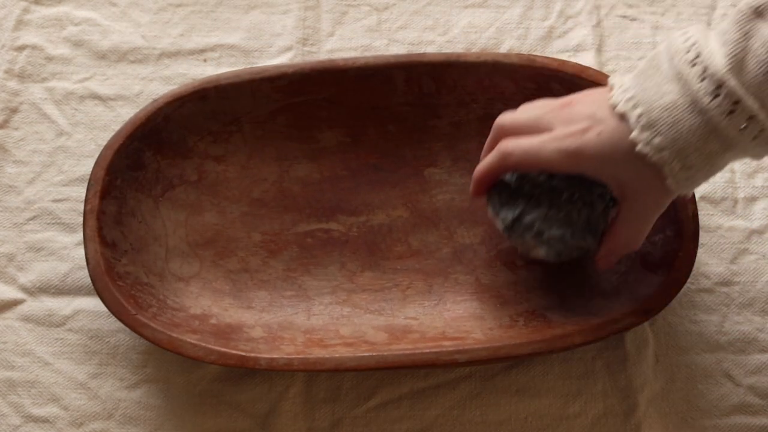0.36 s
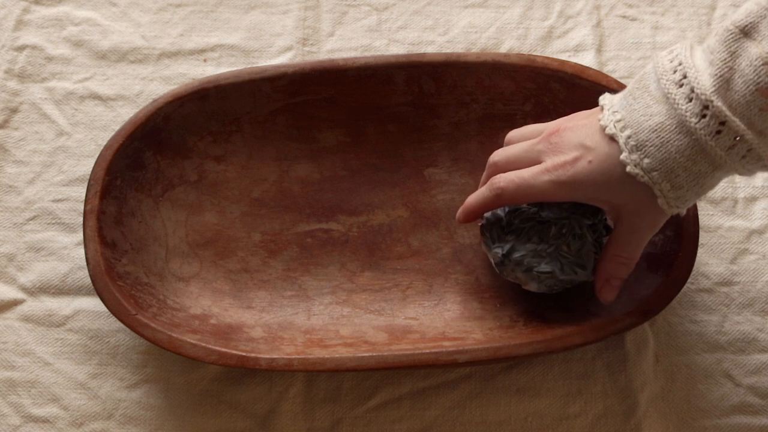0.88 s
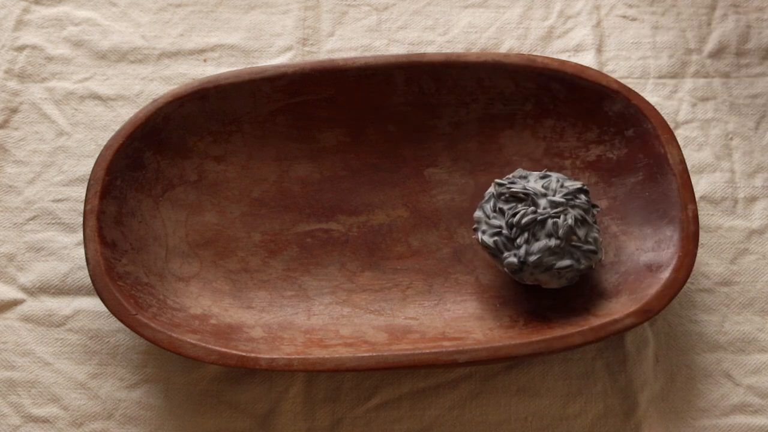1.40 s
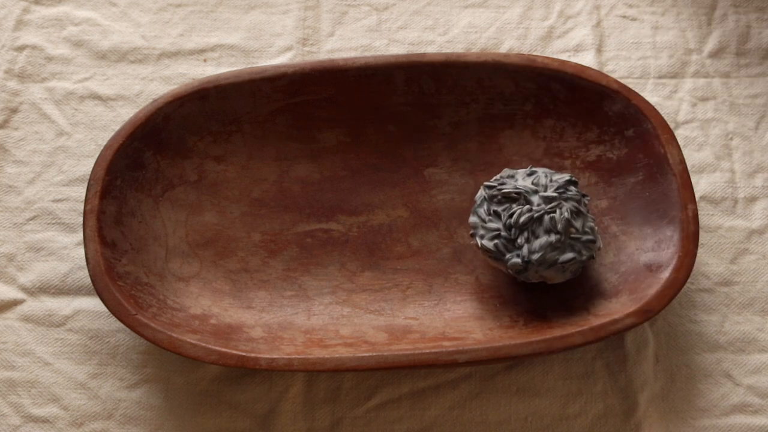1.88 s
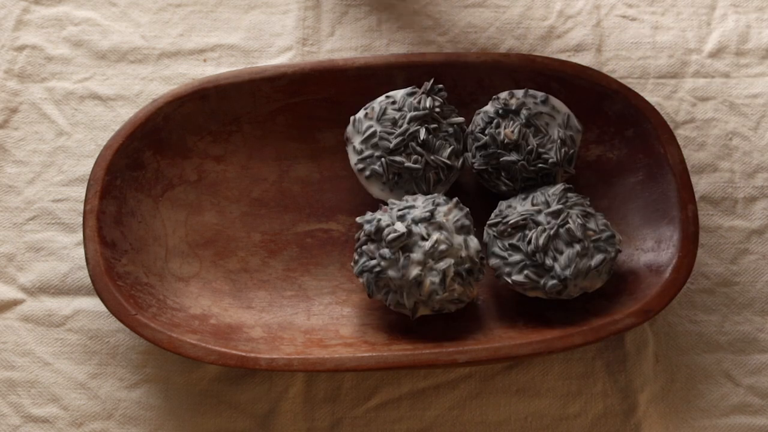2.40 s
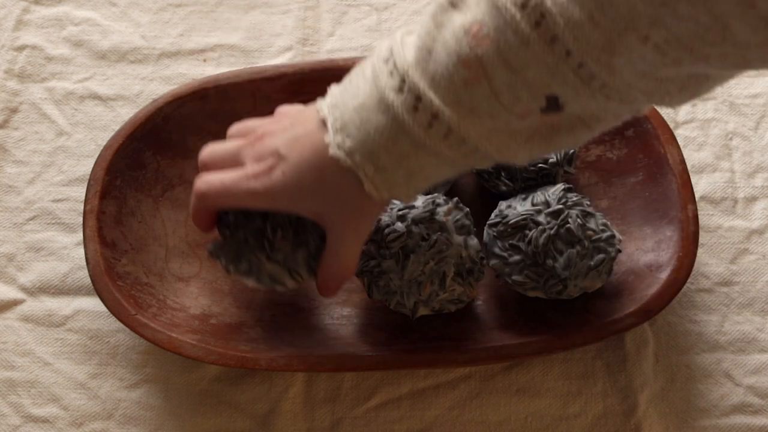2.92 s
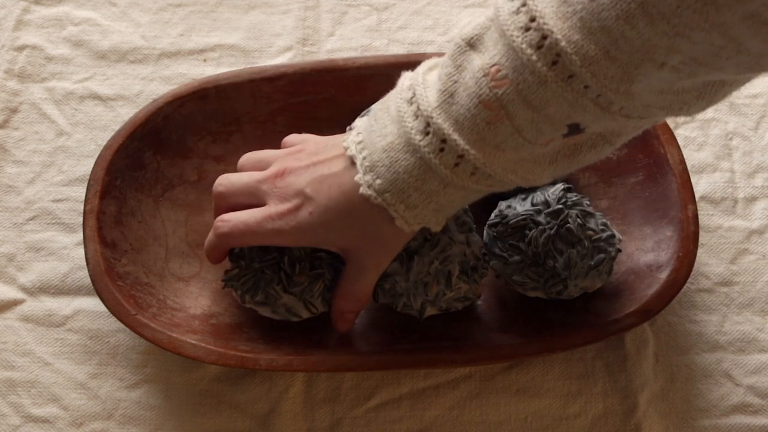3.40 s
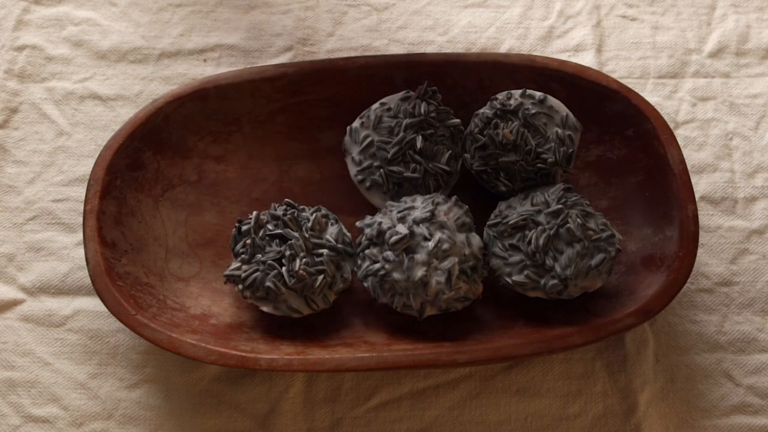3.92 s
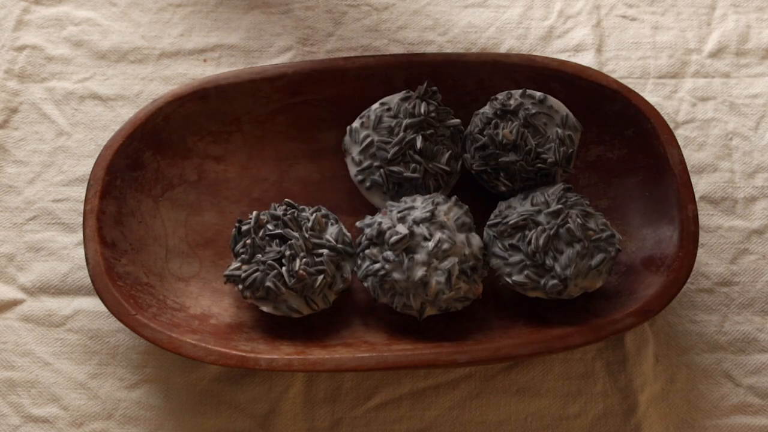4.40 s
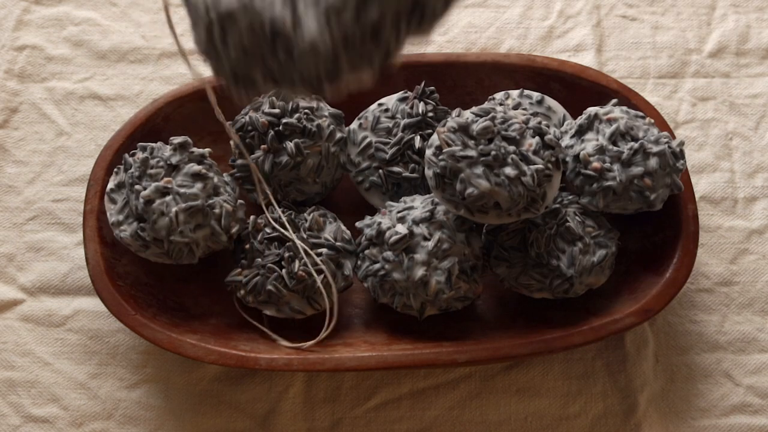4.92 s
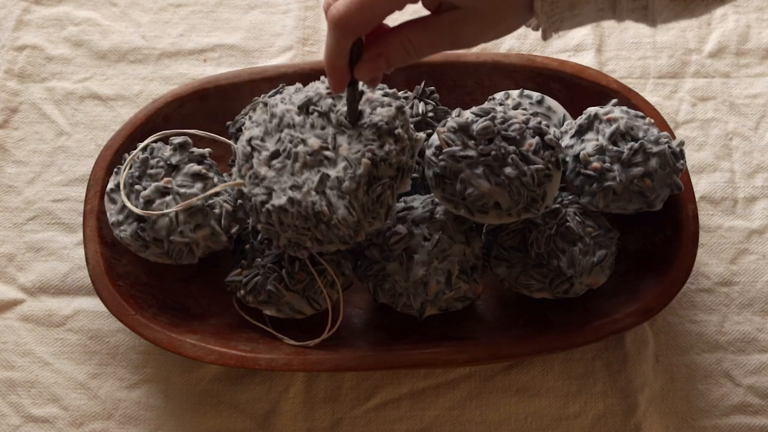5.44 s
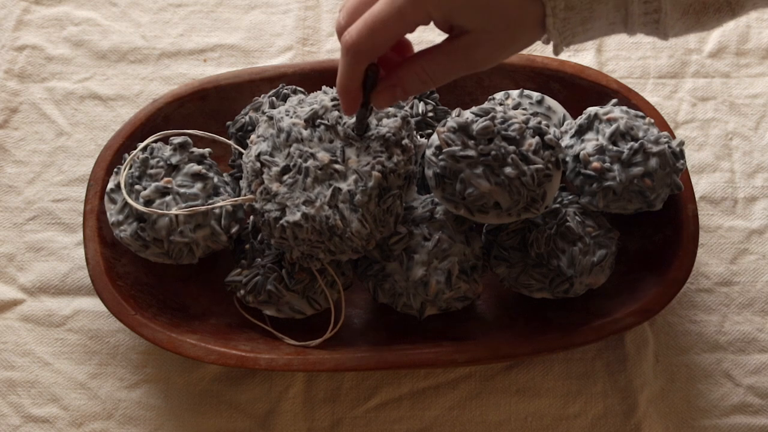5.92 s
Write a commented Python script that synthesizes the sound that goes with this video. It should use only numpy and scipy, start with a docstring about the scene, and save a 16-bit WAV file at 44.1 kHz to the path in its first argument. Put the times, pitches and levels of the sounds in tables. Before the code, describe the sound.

A close, quiet indoor sound with low airy room tone, light hiss and a very faint distant motor hum that wavers. At about 0.6 s a hard seed cake touches a wooden bowl with a small woody knock and light scrape. From 0.9 to 1.15 s several quick taps mingle with gritty rubbing and husky ticks, trailing into a soft slide until about 1.5 s. Faint low bumps follow, then a crisp, brighter knock at 1.96 s. Dull bowl shifts murmur around 2.2 s. Near 3.3 s a light touch precedes the loudest event, a hard, dry double clack at 3.35 and 3.42 s with a short rasp and brief room tail. Cloth rustles softly near 3.9 s, and faint low shifting continues to 4.6 s. Small dry ticks come at 4.8 and 5.1 s, then light, muted knocks at 5.57 and 5.8 s with sleeve rustle, fading into quiet.

```python
"""Hard seed cakes are set down in a wooden bowl on a cloth-covered table in a quiet room.
Knocks come at 0.6 s and near 1 s amid scrapes, then at 2 s; the hardest fall near 3.4 s, and lighter
ones follow from 4.8 s. Each knock is a sum of dying modes, low for weight and high for a hard seed edge.
Drags are random bumps on the same modes, and husks tick as short grains. Throughout, a sleeve rustles as
shaped noise, a small motor hums far off as faint sines, the third of which swells and fades, and air and
microphone hiss are noise."""
import sys
import numpy as np
from scipy import signal
from scipy.io import wavfile
from scipy.ndimage import uniform_filter1d

SR = 44100
rng = np.random.default_rng(int(sys.argv[2]) if len(sys.argv) > 2 else 0)


def gain_from_db(level_db):
    """Turn a decibel level (scalar or array-like) into a linear amplitude factor."""
    decades = np.asarray(level_db, float) / 20
    return 10 ** decades


def inscribe(sig):
    """Save sig as 16-bit PCM at rate SR to the path in sys.argv[1].

    A 1-D sig is mono; a 2-D sig holds one channel per row.
    Samples are clipped to [-1, 1] before scaling.
    """
    pcm = np.round(np.clip(np.atleast_2d(sig).T, -1, 1) * 32767)
    wavfile.write(sys.argv[1], SR, pcm.astype(np.int16))


N = 266937  # samples

# Modes of the bowl on its table. Each row: frequency in Hz, relative level in dB, t60 in seconds,
# direction of the first movement (+1 or -1).
BOWL_MODES = [(52, -5, 0.16, -1), (78.56, 2, 0.23, -1), (97, 2, 0.26, 1), (131, -2, 0.11, 1),
              (162.2, 2, .17, -1), (218.4, -5.5, 0.099, -1), (247.6, 2.5, 0.075, -1), (286, -6, 0.1, 1),
              (350, -4.5, 0.07, -1), (386.7, -11.5, .08, 1), (430, -9.5, 0.0518, -1),
              (500.6, -19.5, 0.16, -1), (600, -9.5, .05, 1), (775, -19, 0.0602, -1), (843, -13.5, 0.024, 1),
              (960, -12, 0.028, -1), (1156, 4.5, .016, -1), (1300, -9.5, .035, -1), (1364, -15, .06, 1),
              (1420, -12.5, .026, -1), (1540, -17.5, 0.014, 1), (1758, -1.5, 0.011, 1),
              (1888, -11.5, 0.036, 1), (2080, -17.5, 0.036, -1), (2400, -18.5, 0.019, 1),
              (2747, -20, 0.017, -1), (3000, -24, 0.015, 1), (3280, -17.5, 0.03, 1), (3700, -21, 0.011, -1),
              (3896, -16.5, .02, 1), (4395, -20, 0.0051, -1), (6200, -26, .009, -1),
              (7075, -17.5, 0.011, -1), (10680, -11.5, .003, -1)]


def rings():
    """Modal superposition: each mode is an exponentially dying sine with a rise of part of a cycle."""
    hz, db, t60, direction = np.transpose(BOWL_MODES)[:, :, None]
    t = np.arange(SR // 3) / SR
    decay = gain_from_db(db - 60 * t / t60)
    rise = 1 - np.exp(-7 * hz * t)
    return np.sign(direction) * decay * np.sin(2 * np.pi * hz * t) * rise


def near(hz, centre_hz, octaves):
    """Selective excitation: a Gaussian weight on a logarithmic frequency axis."""
    return np.exp(-0.5 * (np.log2(hz / centre_hz) / octaves) ** 2)


def edge_click():
    """Contact transient: two bursts at high pitch that die within a few milliseconds."""
    t = np.arange(SR // 3) / SR
    body = t / 0.000095 * np.exp(-t / 0.00015) * np.sin(2 * np.pi * 4800 * t)
    tip = np.exp(-t / 0.00035) * np.sin(2 * np.pi * 10500 * t)
    return body + gain_from_db(-16) * tip


# Landings of a cake's weight. Each row: start in seconds, drive level in dB, centre of the low modes
# it reaches in Hz, spread in octaves.
WEIGHT_LANDINGS = [(.588, -42, 164, .9), (.588, -55, 350, .4), (.6, -59, 305.3, .4), (.592, -39.5, 550, .4),
                   (0.938, -60.5, 193, .7), (0.967, -58, 150, .7), (1.018, -68, 198, .7),
                   (1.101, -37.5, 231.6, .7), (1.121, -55, 275.3, .4), (1.137, -46.5, 201, .7),
                   (1.905, -65, 109, .7), (1.921, -54.5, 332, .4), (1.956, -36.5, 467, 0.3),
                   (1.964, -34, 484, .15), (1.977, -51, 303.8, 0.37), (1.974, -57.5, 102, .7),
                   (3.281, -34, 368, 0.44), (3.294, -43.5, 180, .7), (3.345, -37, 150, 0.98),
                   (3.363, -37.5, 85, 0.56), (3.366, -55, 300.4, .5), (3.378, -42, 247, 0.77),
                   (3.4231, -29, 342, 0.1), (3.4235, -31.5, 600, .15), (3.44, -42.5, 114, .7),
                   (5.566, -39, 93, 0.59), (5.565, -46, 263, 0.65), (5.578, -48.5, 300, .4),
                   (5.790, -45.5, 99.89, 0.7), (5.857, -56.5, 100, 0.46), (5.991, -73, 92.5, .7)]
# Strikes of a hard seed edge. Each row: start in seconds, drive level in dB, centre of the high modes
# it reaches in Hz, spread in octaves.
EDGE_STRIKES = [(0.5886, -50.5, 1250, 0.14), (.589, -47.5, 2200, 0.18), (.589, -51, 3500, 0.18),
                (0.9388, -48, 1300, 0.12), (0.9396, -46, 2200, 0.42), (0.94, -46, 3850, .08),
                (.9694, -47, 2300, 0.18), (0.978, -62, 1250, 0.23), (1.004, -64, 1400, 0.41),
                (1.0198, -40.5, 1370, 0.073), (1.0218, -43, 2100, 0.15), (1.100, -55.5, 1100, 0.49),
                (1.100, -44, 2300, 0.21), (1.104, -45.5, 1910, 0.12), (1.109, -53, 3300, .2),
                (1.144, -38, 820, 0.096), (1.144, -57, 1400, 0.26), (1.957, -54.5, 900, 0.35),
                (1.956, -28.5, 2650, 0.068), (1.966, -46.5, 4200, .3), (1.966, -53.5, 1870, 0.18),
                (1.978, -48, 3600, 0.2624), (3.285, -50.5, 2640, 0.48), (3.3459, -13, 1620, 1.07),
                (3.374, -36, 1200, 0.54), (3.4243, -12.5, 1420, 0.027), (3.4243, -39, 1000, 0.33),
                (3.424, -33, 2200, 0.2), (3.424, -50.5, 6300, 0.36), (4.785, -54, 2900, .5),
                (5.099, -55, 1300, 0.404), (5.5645, -42.5, 2700, 0.1968), (5.564, -62.5, 1250, 0.36),
                (5.789, -51, 1500, 0.63), (5.789, -48, 3400, 0.2607)]


def knocks():
    """Impact excitation: a yielding weight favours the low modes, a hard edge the high ones and a click."""
    hz, ring, click = np.transpose(BOWL_MODES)[0], rings(), edge_click()
    t = np.arange(ring.shape[1]) / SR
    soft = ring * (1 - np.exp(-t / 0.0017))  # the cake yields, so the push takes a moment
    out = np.zeros(N + SR)
    for start_s, db, low_hz, octaves in WEIGHT_LANDINGS:
        weight = near(hz, low_hz, octaves) @ soft
        out[round(start_s * SR):][:len(t)] += gain_from_db(db) * weight
    for start_s, db, high_hz, octaves in EDGE_STRIKES:
        click_share = gain_from_db(1.8) * near(5200, high_hz, 1.3 * octaves)
        edge = near(hz, high_hz, octaves) @ ring - click_share * click
        out[round(start_s * SR):][:len(t)] += gain_from_db(db) * edge
    return out[:N]


def stroke(peak_s, swell_s, die_s, db):
    """Envelope linear in decibels about its peak; returns the first sample and the gain."""
    fade_db = -25.5  # reached after a full swell and a full die-away
    t = np.arange(-min(swell_s, peak_s), die_s, 1 / SR)
    distance = np.where(t < 0, -t / swell_s, t / die_s)
    gain = gain_from_db(db + fade_db * distance) * signal.windows.tukey(len(t), 0.04)
    first = round((peak_s + t[0]) * SR)
    return first, gain[:N - first]


def rubbing(strokes, octaves, per_s, spread_db, locking):
    """Friction as random impacts: small bumps strike the bowl modes while something drags on it."""
    out = np.zeros(N)
    hz, _, t60, _ = np.transpose(BOWL_MODES)
    cycles = hz * t60
    # locking: how strongly the slip favours the modes that ring freely
    ring = rings()[:, :SR // 8] * cycles[:, None] ** locking / cycles.mean() ** locking
    for *shape, centre_hz in strokes:
        first, gain = stroke(*shape)
        n = len(gain) + SR // 20  # the rubbing is under way before it is heard
        bumps = (rng.random(n) < per_s / SR) * gain_from_db(spread_db * rng.exponential(1, n))
        share = near(hz, centre_hz, octaves)
        reached = share > 1e-3
        # every bump lands elsewhere, so the modes share it anew
        places = rng.standard_normal((reached.sum(), n))
        drive = bumps * places * share[reached, None]
        sound = signal.fftconvolve(drive, ring[reached], axes=1).sum(0)[:n]
        # the stroke alone sets the slow level
        sound /= np.sqrt(uniform_filter1d(sound ** 2, size=SR // 12) + 1e-9)
        out[first:][:len(gain)] += gain * sound[-len(gain):]
    return out


# Seeds scraping the wood. Each row: peak in seconds, swell in seconds, die-away in seconds,
# peak level in dB, centre in Hz.
SCRAPE_STROKES = [(.46, .03, 0.27, -65.5, 420), (.57, 0.22, 0.037, -64, 495),
                  (.97, 0.027, 0.016, -68, 1600), (.989, .03, 0.017, -58.5, 1740),
                  (1.024, .035, 0.027, -61.5, 1850), (1.05, .02, 0.062, -73, 2111),
                  (1.26, 0.14, 0.25, -70, 1490), (1.115, .012, .08, -61.5, 696),
                  (1.27, 0.11, 0.17, -67.5, 660), (1.96, 0.003828, 0.13, -64.5, 1154),
                  (3.382, .02, 0.12, -42.5, 1290), (3.455, .03, 0.2, -57.5, 1500),
                  (5.105, .012, 0.12, -62, 1300), (5.11, 0.015, 0.13143, -71, 2306),
                  (.6, .01, 0.05631, -71.5, 3293), (1.008, .008, 0.023, -65, 1700),
                  (1.024, .02, .02, -66.5, 3000), (5.8, 0.0073, .04, -74, 1380)]


def scrapes():
    """Rough friction: dense bumps excite a moderately broad group of modes."""
    return rubbing(SCRAPE_STROKES, octaves=0.65, per_s=1500, spread_db=1.0, locking=0.56)


# Steady slides. Each row: peak in seconds, swell in seconds, die-away in seconds,
# peak level in dB, centre in Hz.
SLIDE_STROKES = [(.925, 0.13, .03, -75, 3750), (.989, .03, .02, -61, 1970), (1.15, .012, .15, -67.5, 1950),
                 (1.24, .1, .25, -67.5, 2000), (1.2, 0.074, .1, -76, 3280), (3.392, 0.057, .1, -63, 3280)]


def slides():
    """Narrow-band friction: a steady slide keeps a narrow group of modes singing."""
    return rubbing(SLIDE_STROKES, octaves=0.11, per_s=3000, spread_db=1.0, locking=0.56)


# Shifts of the bowl by the hand. Each row: peak in seconds, swell in seconds, die-away in seconds,
# peak level in dB, centre in Hz.
NUDGE_STROKES = [(1.23, 0.017, .1, -66.5, 151), (1.54, 0.24, .2, -69.5, 146.5),
                 (1.72, 0.076, 0.042, -68.5, 84), (1.86, .05, 0.13, -72, 100), (2.198, .1, 0.07, -63, 90),
                 (2.29, 0.0673, 0.071, -61, 83), (3.2, .06, .12, -61.5, 98), (4.236, .11, .2, -64.5, 150),
                 (4.396, 0.199, .16, -65, 175), (4.576, 0.06, 0.1, -66.5, 149)]


def nudges():
    """Sparse friction: as the hand shifts the bowl, few and uneven bumps excite its low modes."""
    return rubbing(NUDGE_STROKES, octaves=0.76, per_s=180, spread_db=3.5, locking=0)


# Cakes brushing one another. Each row: peak in seconds, swell in seconds, die-away in seconds,
# peak level in dB, centre in Hz.
RUSTLE_STROKES = [(0.97, 0.022, .02, -66, 2900), (.989, 0.016, 0.02, -66, 3129),
                  (1.024, 0.019, 0.031, -65, 3060), (1.19, .06, .3, -73, 3300), (1.11, .01, .03, -66, 3020),
                  (1.96, 0.0038, 0.12, -63, 3700), (3.37, .025, 0.12, -63, 3700),
                  (4.787, 0.028, .05, -64, 3200), (4.788, 0.0072, .02, -72, 6520),
                  (0.604, .01, .04, -78, 3265), (5.112, 0.015, .14, -69, 2890), (5.115, .02, .12, -73, 900),
                  (5.775, 0.038, .03, -69.5, 3440)]


def husks():
    """Granular superposition: husks tick together as grains of a few cycles at scattered pitches."""
    husks_per_s = 1500  # at each grain pitch
    out = np.zeros(N)
    hz = np.geomspace(500, 9000, num=24)[:, None]
    t = np.arange(SR // 100) / SR
    grains = np.sin(2 * np.pi * hz * t) * hz * t * np.exp(-hz * t / 1.8)
    grains /= np.linalg.norm(grains, axis=1, keepdims=True)
    for *shape, centre_hz in RUSTLE_STROKES:
        first, gain = stroke(*shape)
        size = (len(hz), len(gain))
        ticks = (rng.random(size) < husks_per_s / SR) * rng.standard_normal(size)
        share = near(hz, centre_hz, octaves=0.4)
        share /= np.linalg.norm(share) * np.sqrt(husks_per_s / SR)  # rms 1 before the stroke's gain
        sound = signal.fftconvolve(ticks * share * gain, grains, axes=1).sum(0)
        out[first:][:len(gain)] += sound[:len(gain)]
    return out


def evened(x):
    """Power normalisation: scales to rms 1."""
    return x / np.sqrt(np.mean(x ** 2) + 1e-20)


def read(points, hz):
    """Interpolation of a spectrum along a logarithmic frequency axis."""
    point_hz, value = np.transpose(points)
    return np.interp(np.log(hz + 1), np.log(point_hz + 1), value)


def noise(colour, patchy_db):
    """Shaped Gaussian noise: random short-time spectra with drifting patches, at rms 1."""
    real, imaginary, patches = rng.standard_normal((3, 513, N // 256 + 5))
    patches = uniform_filter1d(patches, size=10, axis=0)  # over frequency
    patches = evened(uniform_filter1d(patches, size=14, axis=1))  # over time
    hz = np.fft.rfftfreq(1024, 1 / SR)[:, None]
    spectra = (real + 1j * imaginary) * gain_from_db(read(colour, hz) + patchy_db * patches)
    return evened(signal.istft(spectra, nperseg=1024, noverlap=768)[1][:N])


# Passes of the sleeve. Each row: peak in seconds, swell in seconds, die-away in seconds,
# peak level in dB.
SLEEVE_STROKES = [(0.401, 1, 0.44, -79.5), (0.931, 0.134, 0.093, -70.5), (1.57, 1, 0.19, -77.5),
                  (2.27, 1, 0.81, -80), (2.9, 0.54, 0.55, -80), (3.88, 0.16, 0.6356, -73),
                  (4.6, 1, 0.11, -75.5), (5.0, 1, .47, -80), (5.785, 0.11, 0.015207, -69.5)]
# Spectrum of the cloth. Each row: frequency in Hz, relative level in dB.
CLOTH_SPECTRUM = [(500, -22), (1500, -9), (3000, -6.5), (3650, 1.5), (4200, -6.5), (5000, -14.5),
                  (7000, -15)]


def sleeve():
    """Incoherent addition: the powers of overlapping cloth strokes sum and shape one noise."""
    power = np.zeros(N)
    for row in SLEEVE_STROKES:
        first, gain = stroke(*row)
        power[first:][:len(gain)] += gain ** 2
    return np.sqrt(power) * noise(CLOTH_SPECTRUM, patchy_db=1.0)


# Decay of the room. Each row: frequency in Hz, t60 in seconds.
ROOM_DECAY = [(80, 0.46), (300, 0.53), (1200, 0.21), (3500, 0.097), (5000, 0.153), (12000, 0.1)]
# Share of the sound that the walls throw back. Each row: frequency in Hz, relative level in dB.
WALL_REFLECTION = [(100, -16.5), (300, -12), (700, -2), (2000, -1), (2300, -10), (3000, -11), (3300, -2),
                   (3800, -8), (4200, -13), (4600, -20.5), (5000, -34), (6000, -54), (12000, -58)]


def room(x):
    """Diffuse reverberation: sparse taps of random sign, each band dying at its own speed."""
    build_s = 0.038  # the echoes take this long to gather
    taps = np.zeros(SR)
    at = np.arange(400, SR - 20, 20)
    growth = np.minimum(at / SR / build_s, 1) ** 2
    taps[at + rng.integers(0, 20, len(at))] = rng.choice([-1., 1.], len(at)) * growth
    hz, t, spectra = signal.stft(taps, SR, nperseg=256)
    band_db = read(WALL_REFLECTION, hz)[:, None] - 60 * t / read(ROOM_DECAY, hz)[:, None]
    tail = signal.istft(spectra * gain_from_db(band_db), SR, nperseg=256)[1]
    return signal.fftconvolve(x, tail / np.linalg.norm(tail))[:N]


# Harmonics 1 to 4 of the motor. Each entry: rms level in dB, for the third before its swell.
HARMONIC_LEVELS = [-88.5, -84.5, -84, -92.5]
# Swell of the third harmonic. Each row: time in seconds, gain in dB.
THIRD_HARMONIC_SWELL = [(0, 0.5), (.9, -2), (1.2, -6), (1.7, 2.5), (2.4, -1.5), (2.8, -33), (3.15, 3.5),
                        (3.6, -4), (3.95, 1.5), (4.5, -17.5), (4.95, 3.5), (5.8, -2), (6.05, -6)]


def motor():
    """Harmonic series: faint sines at multiples of one frequency; the third swells and fades."""
    fundamental_hz = 263.3
    t = np.arange(N) / SR
    out = np.zeros(N)
    for k, db in enumerate(HARMONIC_LEVELS, start=1):
        tone = np.sqrt(2) * gain_from_db(db) * np.sin(2 * np.pi * k * fundamental_hz * t)
        if k == 3:
            tone *= gain_from_db(np.interp(t, *np.transpose(THIRD_HARMONIC_SWELL)))
        out += tone
    return out


# Spectrum of the air in the room. Each row: frequency in Hz, relative density in dB per Hz.
AIR_SPECTRUM = [(12, -28), (20, -6), (27, 1), (81, -2), (119, 1.5), (344, -4), (494, -8), (537, -7),
                (751, -10.5), (840, -11.5), (1640, -14.5), (1890, -17), (15700, -25.5)]


def air():
    """Stationary background: shaped noise common to both channels."""
    return gain_from_db(-68.5) * noise(AIR_SPECTRUM, patchy_db=2.0)


# Spectrum of the microphone hiss. Each row: frequency in Hz, relative density in dB per Hz.
HISS_SPECTRUM = [(59, -45), (100, -15), (156, -6), (282, -7), (413, -1.5), (591, -5), (795, -6.5),
                 (3800, -3.5), (15700, -5)]


def capsule_hiss():
    """Antiphase noise: one shaped hiss enters the two channels with opposite sign."""
    side = gain_from_db(-78.5) * noise(HISS_SPECTRUM, patchy_db=1.05)
    return np.array([side, -side])


def scene():
    """Linear superposition: the bowl sounds with their reverberation and the background, centred."""
    bowl = knocks() + husks() + scrapes() + slides() + nudges()
    mid = bowl + gain_from_db(-23.5) * room(bowl) + sleeve() + motor() + air()
    return np.array([mid, mid])


def top_cut(x):
    """Nothing passes above the cut-off."""
    return signal.sosfilt(signal.butter(12, 16540, fs=SR, output="sos"), x)


def record(dry):
    """Saturation: the scene with capsule hiss passes an input stage that flattens the loudest peak."""
    ceiling = 0.34  # of full scale
    loud = dry + capsule_hiss()
    mix = loud / (1 + (loud / ceiling) ** 6) ** (1 / 6)
    return top_cut(mix)


dry = scene()
out = record(dry)
inscribe(out)
```